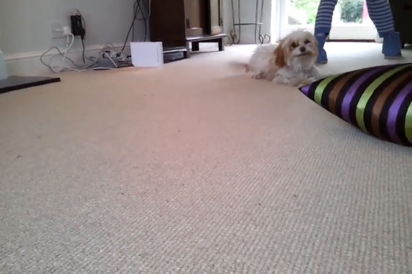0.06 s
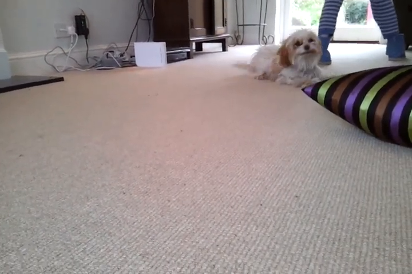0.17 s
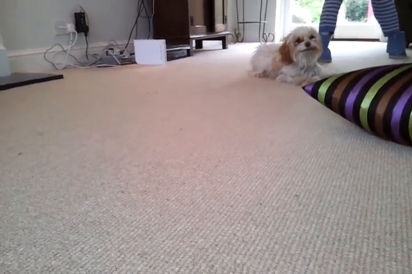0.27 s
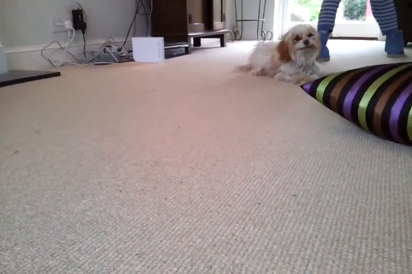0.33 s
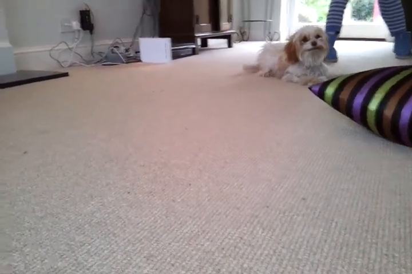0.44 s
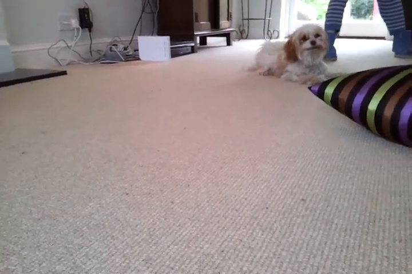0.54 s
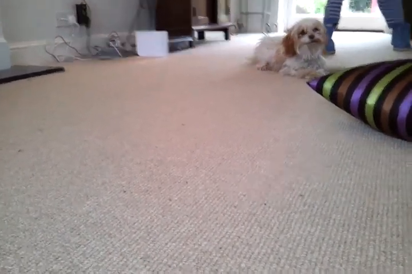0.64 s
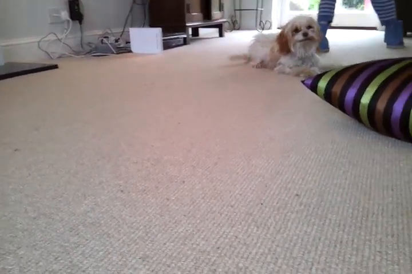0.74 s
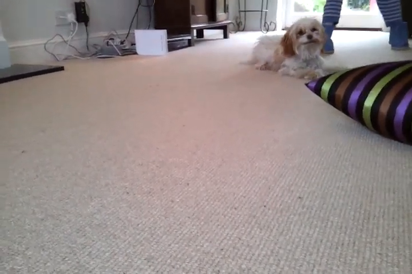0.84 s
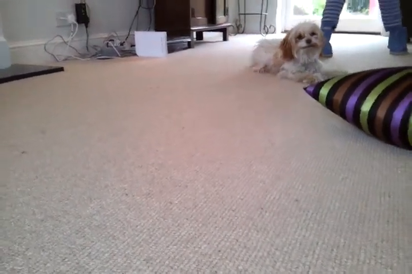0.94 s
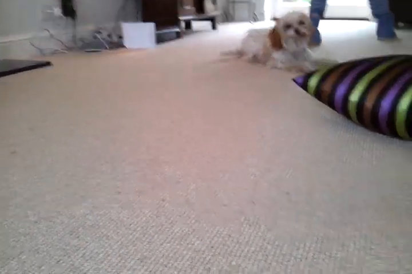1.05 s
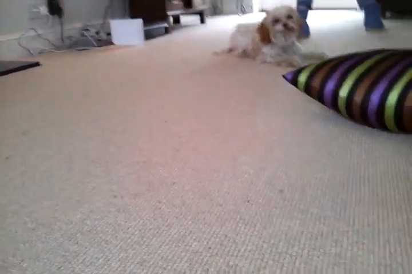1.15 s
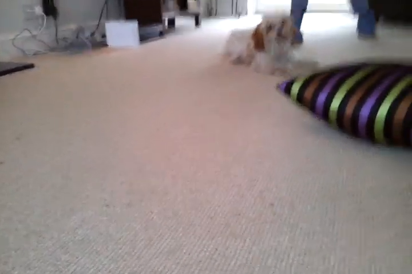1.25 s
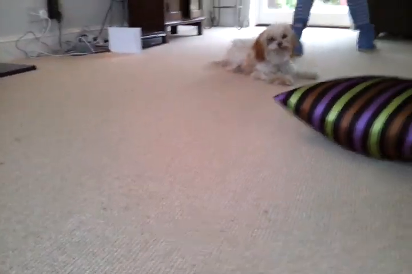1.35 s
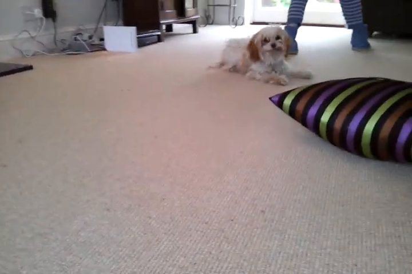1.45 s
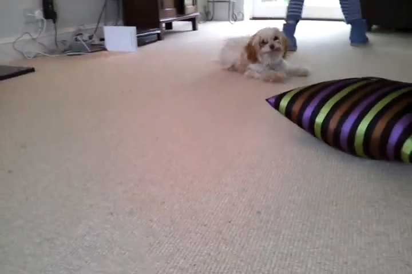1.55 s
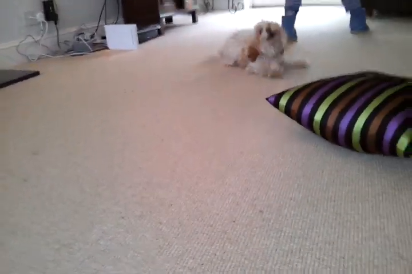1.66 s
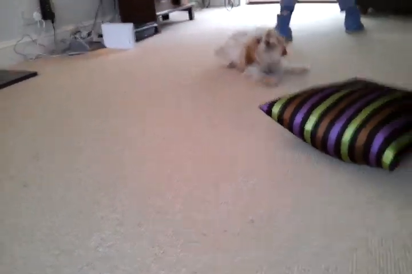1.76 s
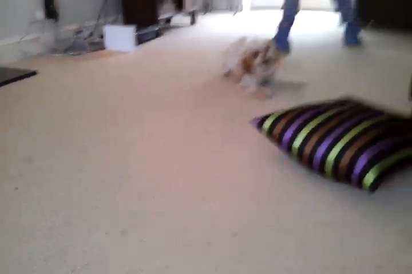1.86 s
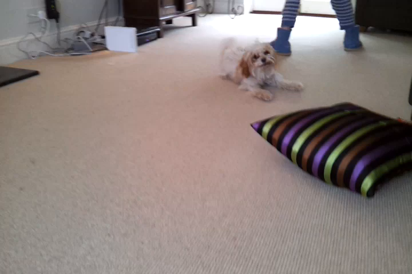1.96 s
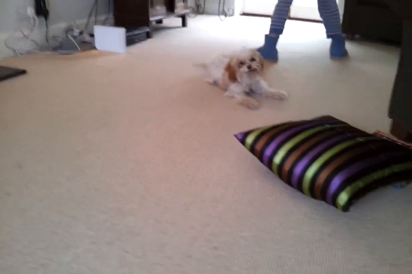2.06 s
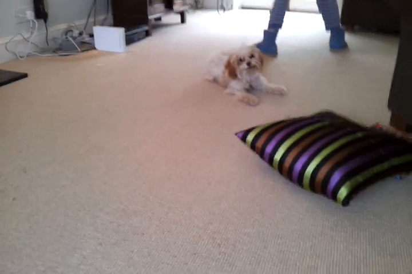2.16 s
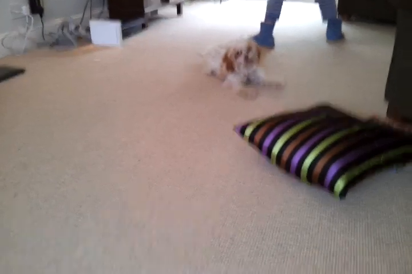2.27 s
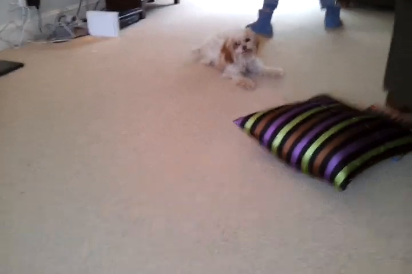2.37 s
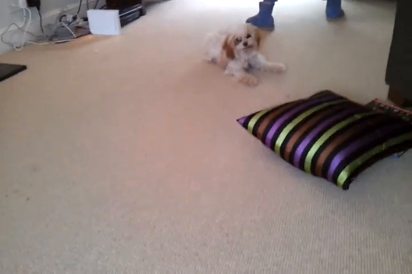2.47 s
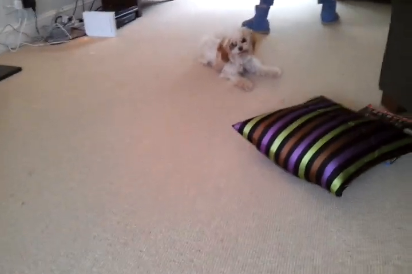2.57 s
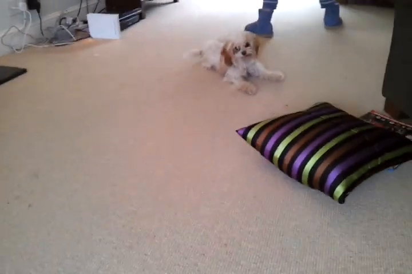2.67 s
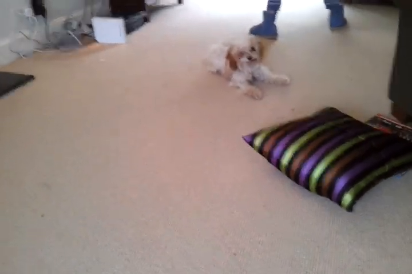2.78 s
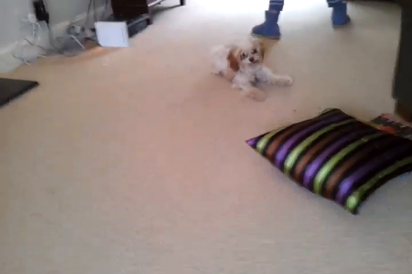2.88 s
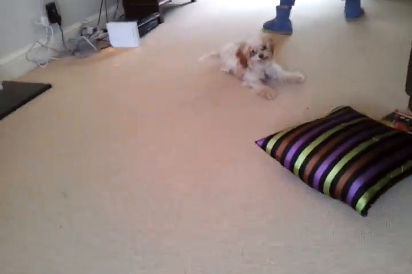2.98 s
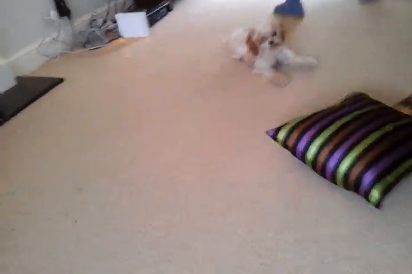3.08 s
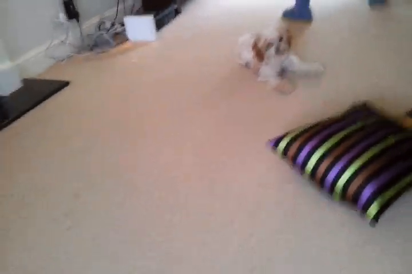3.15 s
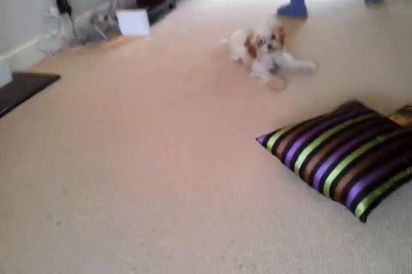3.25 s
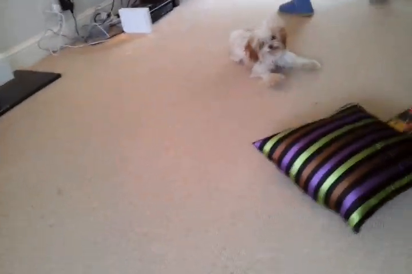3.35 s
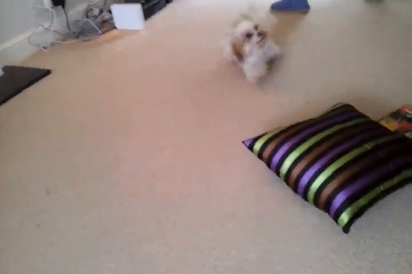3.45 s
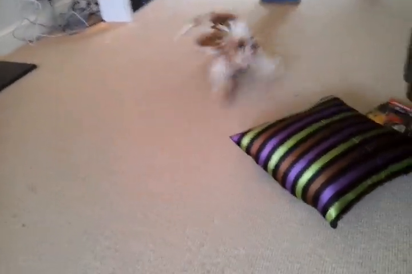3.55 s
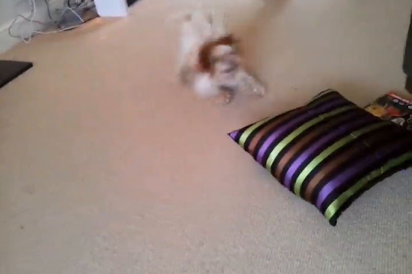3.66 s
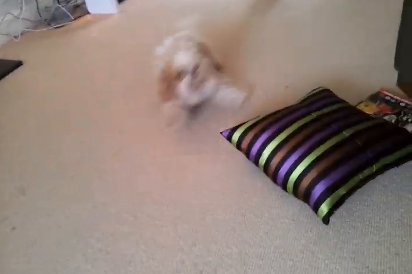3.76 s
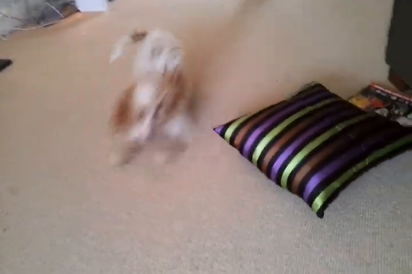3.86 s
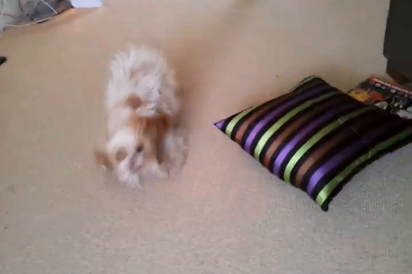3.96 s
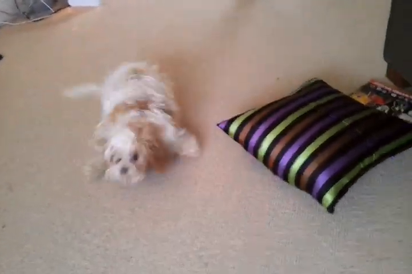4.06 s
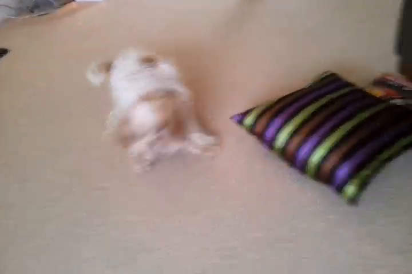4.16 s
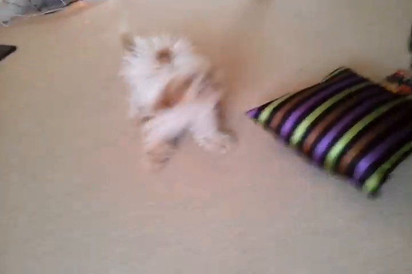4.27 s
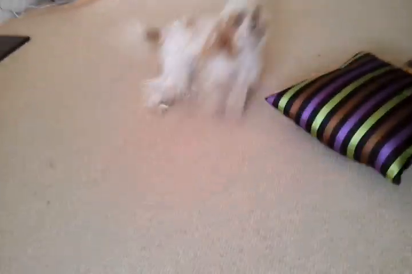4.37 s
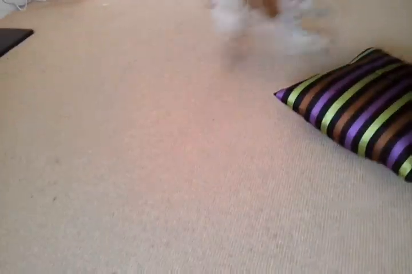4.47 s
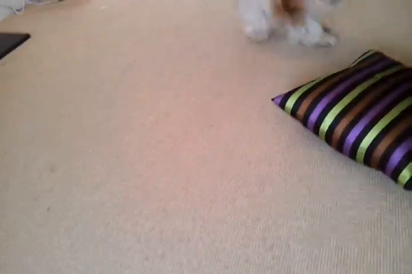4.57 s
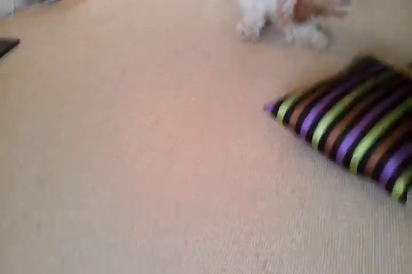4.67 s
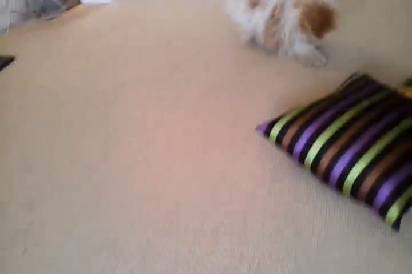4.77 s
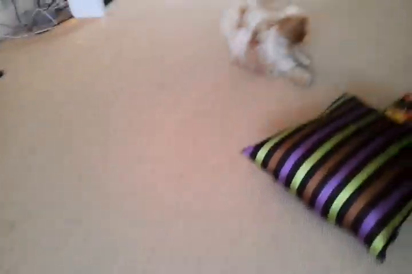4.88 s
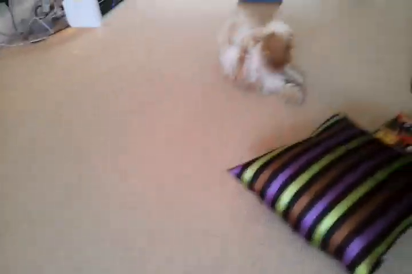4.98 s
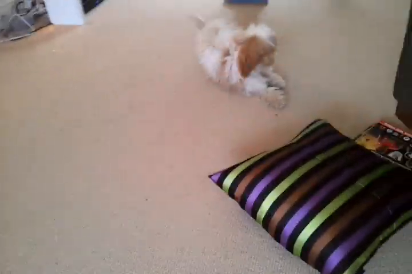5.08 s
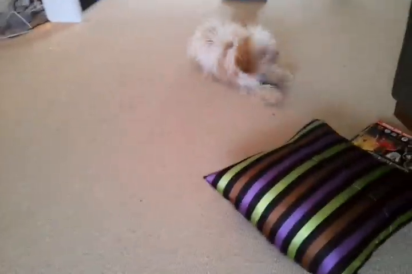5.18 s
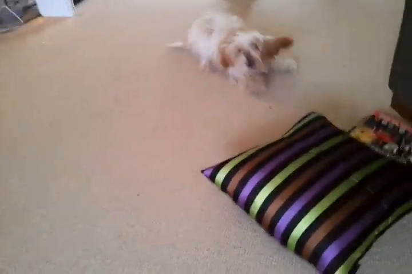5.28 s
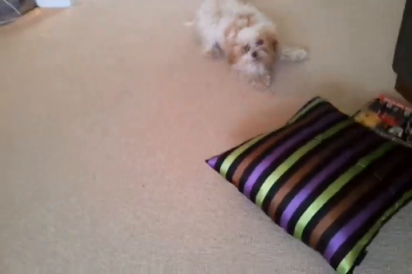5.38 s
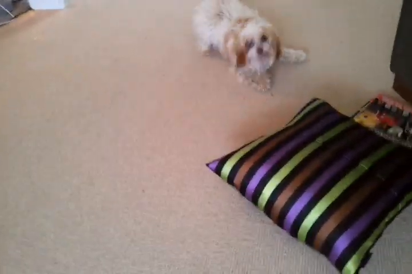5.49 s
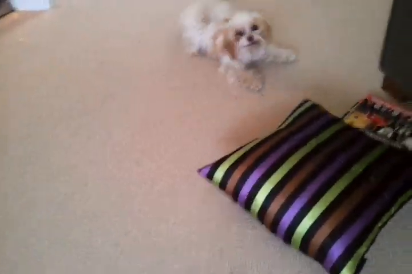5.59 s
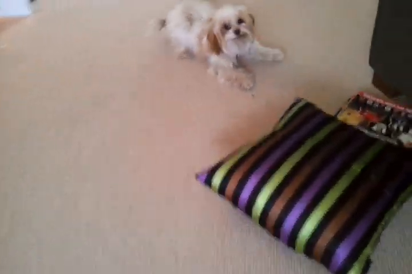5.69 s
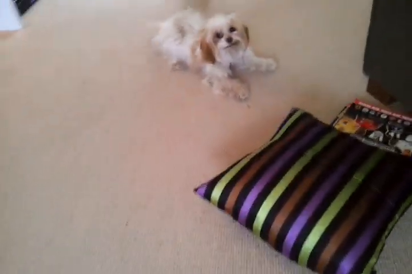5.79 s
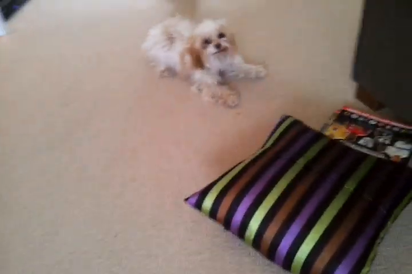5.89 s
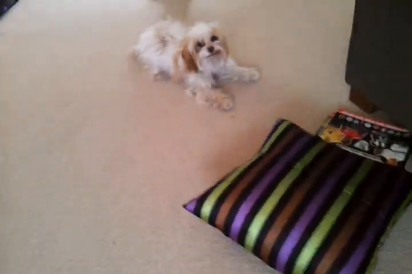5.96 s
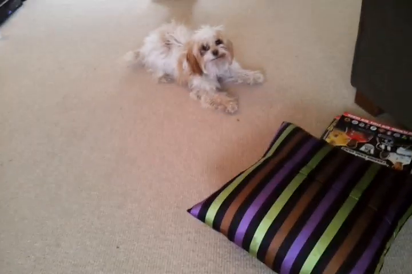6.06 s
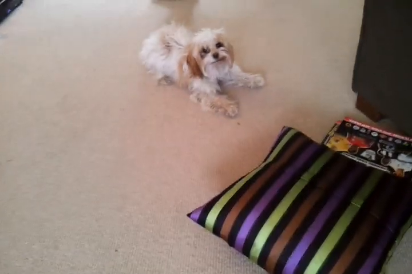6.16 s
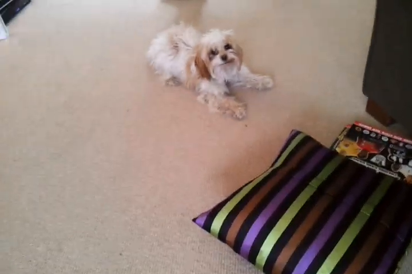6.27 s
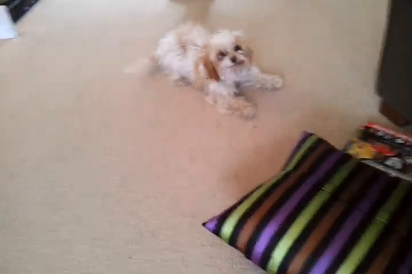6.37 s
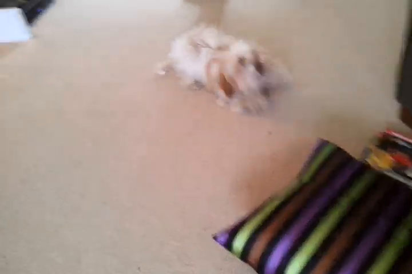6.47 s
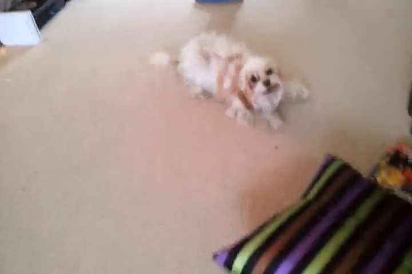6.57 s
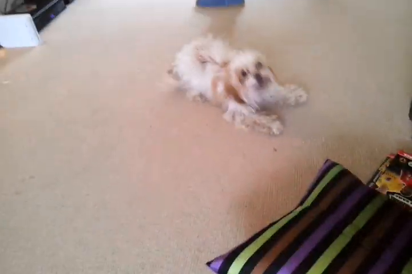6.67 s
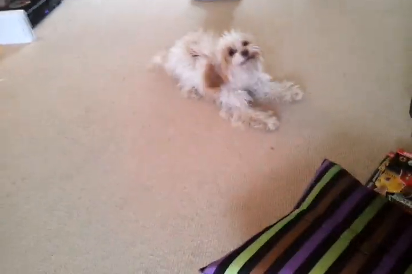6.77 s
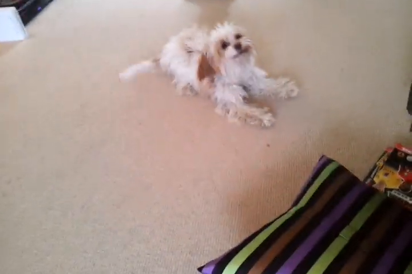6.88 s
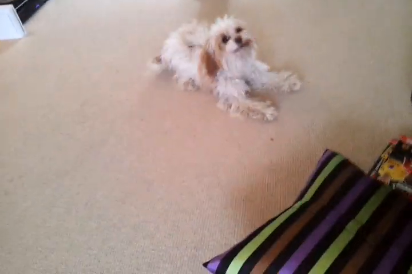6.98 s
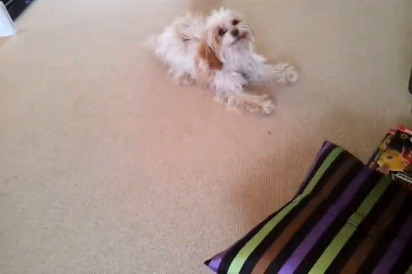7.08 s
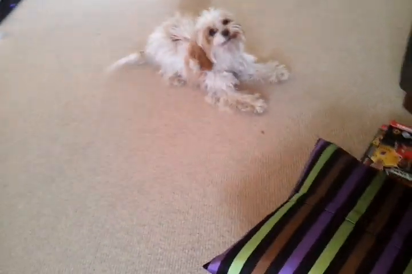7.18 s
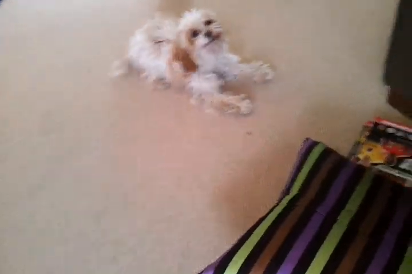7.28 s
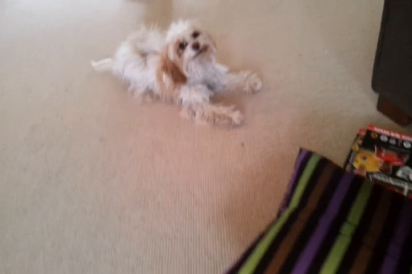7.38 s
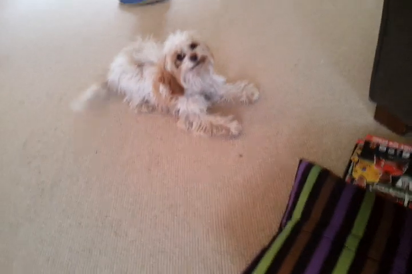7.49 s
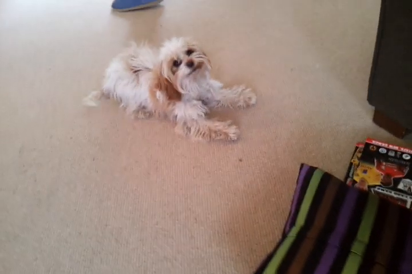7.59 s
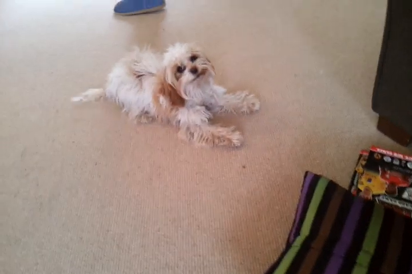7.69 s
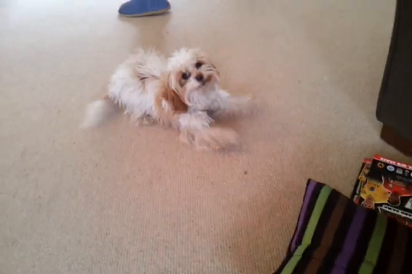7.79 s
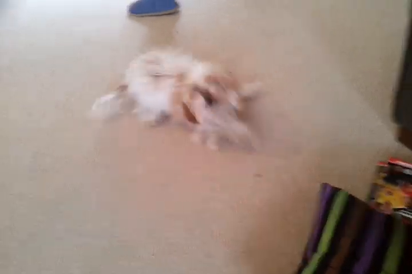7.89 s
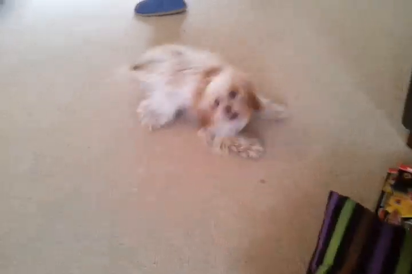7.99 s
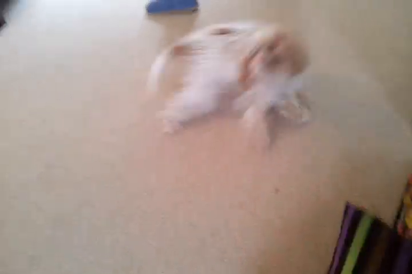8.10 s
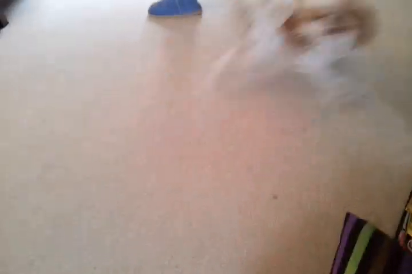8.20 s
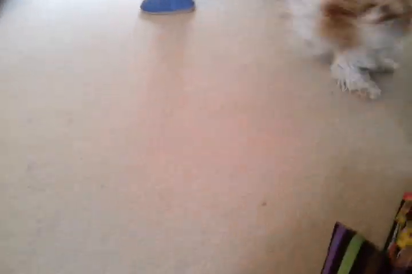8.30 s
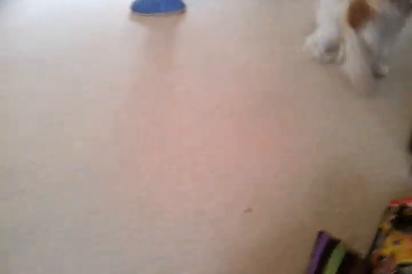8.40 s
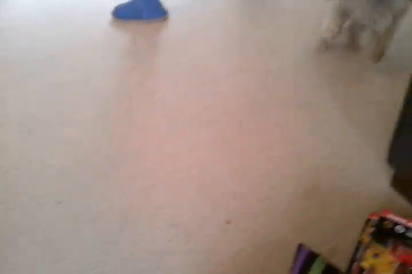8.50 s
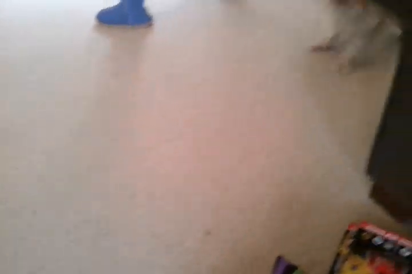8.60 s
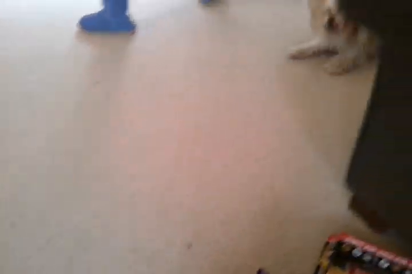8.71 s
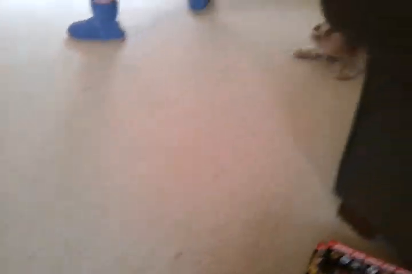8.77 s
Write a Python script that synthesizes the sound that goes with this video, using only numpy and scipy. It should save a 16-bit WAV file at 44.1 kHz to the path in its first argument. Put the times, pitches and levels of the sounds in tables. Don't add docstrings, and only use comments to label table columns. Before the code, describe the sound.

Single high, bright barks from a little dog, with quiet growls, panting and paw thumps on carpet, ending in a rapid burst of barking.

```python
import sys
import numpy as np
from scipy import signal
from scipy.fft import rfft, irfft, next_fast_len
from scipy.io import wavfile
from scipy.ndimage import uniform_filter1d, map_coordinates

SR = 44100
rng = np.random.default_rng(int(sys.argv[2]) if len(sys.argv) > 2 else 0)


def invert_db(level):
    return 10 ** (np.asarray(level, dtype=float) / 20)


def unload_audio(sound):
    columns = np.transpose(np.atleast_2d(sound))
    steps = np.round(np.clip(columns, -1, 1) * 32767)
    wavfile.write(sys.argv[1], SR, steps.astype(np.int16))


N = 389844
LEAD = SR // 4
TIME = (np.arange(N + LEAD) - LEAD) / SR


def unit(x):
    return x / np.sqrt(np.mean(x ** 2) + 1e-20)


def noise():
    return rng.standard_normal(len(TIME))


def along(points, hz):
    f, v = np.transpose(points)
    return np.interp(np.log(hz + 1), np.log(f + 1), v)


def curves(tables):
    rows = []
    for table in tables:
        table = np.array(table, float)
        before, after = table[0].copy(), table[-1].copy()
        before[0] -= .012
        after[0] += .012
        before[2] -= 45
        after[2] -= 45
        rows += [before, *table, after]
    s, *cols = np.transpose(rows)
    return [np.interp(TIME, s, c) for c in cols]


def wobble(knots_per_s):
    at = np.arange(len(TIME)) * knots_per_s / SR
    return map_coordinates(rng.standard_normal(int(at[-1]) + 4), [at])


def filtered(x, response):
    m = next_fast_len(len(x) + 8192)
    return irfft(rfft(x, m) * response(np.fft.rfftfreq(m, 1 / SR)), m)[:len(x)]


def tract(x, modes):
    def response(f):
        total = 0
        for k, (c, width, db) in enumerate(modes):
            total = total + (-1) ** k * invert_db(db) * 1j * f * width / (c * c - f * f + 1j * f * width)
        return total
    return filtered(x, response)


def folds(pitch_hz, rough, jitter, shimmer_db, tilt, air, count):
    rough = np.clip(rough, 0, 1)
    shake = np.sqrt(rough)
    unsteady_hz = pitch_hz * (1 + jitter * rough * wobble(pitch_hz.mean() / 3))
    phase = 2 * np.pi * np.cumsum(unsteady_hz) / SR
    puffs = unit(sum(np.sin(k * phase) / k ** tilt for k in range(1, count)))
    puffs = puffs * invert_db(shimmer_db * shake * wobble(pitch_hz.mean() / 4))
    hiss = unit(noise() * (1.1 + np.cos(phase)))
    return np.sqrt(1 - rough) * puffs + air * shake * hiss


def rush(spectrum, patchy_db):
    hz, _, z = signal.stft(rng.standard_normal(len(TIME) + 512), SR, nperseg=512)
    field = uniform_filter1d(rng.standard_normal(z.shape), size=5, axis=0)
    field = unit(uniform_filter1d(field, size=10, axis=1))
    gain_db = along(spectrum, hz)[:, None] + patchy_db * field
    return unit(signal.istft(z * invert_db(gain_db), nperseg=512)[1][:len(TIME)])


def swells(rows):
    power = np.zeros(len(TIME))
    for s, db, rise_s, fall_s in rows:
        first = max(round((s - 4 * rise_s) * SR) + LEAD, 0)
        near = slice(first, round((s + 4 * fall_s) * SR) + LEAD)
        t = TIME[near] - s
        drop_db = 12 * np.where(t < 0, -t / rise_s, t / fall_s)
        power[near] += invert_db(2 * (db - drop_db))
    return np.sqrt(power)


def bark_shape(timing, voice, jaw):
    s, attack_s, swell_s, fall_s, peak_db = timing
    first_hz, open_hz, top_hz, rough_in, rough_out = voice
    wide, held, rasp_db, held_db, spell_s = jaw
    start_db, halfway_db, open_db, knee_db, end_db = -31, -14, 0, -13, -31.5
    settle_s, spell_db_per_s = .012, -120
    parted, catch = .4, .2
    sag = .97
    opened, peak = s + attack_s, s + attack_s + swell_s
    clear = .25 * min(rough_in, rough_out)
    near = 1 - min(settle_s / swell_s, .9)
    near_hz = open_hz + near * (top_hz - open_hz)
    near_db = open_db + near * (peak_db - open_db)
    broken_s = spell_s + settle_s
    broken_db = peak_db + spell_db_per_s * broken_s - 1.5
    knee_s = max(.62 * fall_s, broken_s + .004)
    end_s = max(fall_s, knee_s + settle_s)
    slack, faded_db = (.55 + wide) / 2, held_db - 7
    return [(s, first_hz, start_db, rough_in + catch, parted * wide, (held_db + rasp_db) / 2),
            (s + attack_s / 2, (first_hz + open_hz) / 2, halfway_db, rough_in + catch / 2,
             (1 + parted) / 2 * wide, rasp_db),
            (opened, open_hz, open_db, rough_in, wide, rasp_db),
            (opened + near * swell_s, near_hz, near_db, .45 * rough_in, wide, rasp_db),
            (peak, .985 * top_hz, peak_db, clear, held, held_db),
            (peak + spell_s, top_hz, peak_db + spell_db_per_s * spell_s, clear, held, held_db),
            (peak + broken_s, top_hz, broken_db, .8 * rough_out, slack, held_db),
            (peak + knee_s, top_hz * (1 + sag) / 2, peak_db + knee_db, rough_out, slack, faded_db),
            (peak + end_s, sag * top_hz, peak_db + end_db, rough_out, slack, faded_db)]


# start in seconds, attack in s, swell in s, fall in s, peak effort in dB.
BARK_TIMES = [(-.22, .04, .06, .06, 9), (1.632, .042, .046, .06, 5), (3.675, .042, .03, .125, 10.5),
              (3.99, .014, .045, .11, 7), (5.318, .022, .035, .095, 9.5), (6.447, .022, .035, .11, 9),
              (7.858, .032, .055, .09, 8), (8.078, .032, .05, .12, 11), (8.385, .027, .052, .1, 7),
              (8.76, .03, .058, .1, 3.5)]
# first pitch in Hz, pitch after the attack in Hz, top pitch in Hz,
# roughness before the peak [0-1], roughness after it [0-1].
BARK_VOICES = [(799.6, 860, 872, .6, .75), (719, 690, 820, .2, .12), (541, 720, 880, .6, .15),
               (689.3, 775, 815, .18, .35), (699.9, 800, 883, .65, .75), (639.6, 785, 845, .4, .55),
               (750.7, 740, 845, .36, .5), (519, 580, 875, .45, .35), (790.2, 730, 830, .42, .5),
               (479.7, 715, 842, .3, 0.5)]
# opening after the attack [0-1], opening at the peak [0-1],
# upper throat rasp after the attack in dB, rasp at the peak in dB, clear spell in seconds.
BARK_MOUTHS = [(.4, .6, -12, -11, .01), (0.6, .8, 6, -4.5, .03), (0.5, .45, -3, -7, .035),
               (0.5, .15, -8, -8.5, .03), (.8, .15, 3.5, -14, .022), (.4, 0.7, 3, -6, .01),
               (0.46, 0.67, 3, -7.5, 0.015), (0.6, .3, -3, -5, .03), (0.3, 0.11, -6, -16, 0.032),
               (0.8, 0.48, 8.5, 0.5, .02)]
# centre in Hz, width in Hz, level in dB.
NARROW_THROAT = [(860, 318, -2), (1750, 560, -6.5), (2650, 320, -37.5), (3632.5, 1100, -17)]
WIDE_THROAT = [(841, 540, -5), (1577, 800, 1), (2180, 850, 1), (2950, 350, -7)]
UPPER_THROAT = [(4390, 420, -13), (5370, 1200, -31.5)]


def barks():
    shapes = map(bark_shape, BARK_TIMES, BARK_VOICES, BARK_MOUTHS)
    pitch_hz, effort_db, rough, mouth, rasp_db = curves(shapes)
    pitch_hz = pitch_hz * (1 + .011 * wobble(45))
    mouth = np.clip(mouth, 0, 1)
    source = folds(pitch_hz, rough, jitter=.17, shimmer_db=7, tilt=.35, air=2.2, count=9)
    source = source * invert_db(effort_db + 5)
    narrow = tract(source * (1 - mouth), NARROW_THROAT)
    wide = tract(source * mouth, WIDE_THROAT)
    return narrow + wide + tract(source * invert_db(rasp_db), UPPER_THROAT)


def yip_shape(s, first_hz, core_hz, db, mouth):
    core_end, edge_db = s + .028, db - 8
    return [(s - .07, first_hz, db - 23, .8, .35),
            (s - .02, first_hz, edge_db, .6, .45),
            (s, core_hz, db, .15, mouth),
            (core_end, core_hz, db, .15, mouth),
            (core_end + .013, core_hz, edge_db, .5, .72 * mouth),
            (core_end + .04 + .1 * mouth, core_hz, db - 25, .55, .66 * mouth)]


# core start in seconds, first pitch in Hz, core pitch in Hz, level in dB, mouth opening [0-1].
SOFT_YIPS = [
    (4.43, 558.3, 571.8, -20.5, 0),
    (4.708, 610, 699.3, -13.5, 0.8),
]
# time in seconds, pitch in Hz, level in dB, roughness [0-1], mouth opening [0-1].
FAINT_WHINE = [(1.04, 775, -60, .01, .01), (1.1, 775, -51, .01, .01), (1.22, 775, -54, .01, .01)]
# centre in Hz, width in Hz, level in dB.
SHUT_MOUTH = [(522.26, 110, 5.5), (1010, 120, -3), (1350, 440, -16), (1953, 490, -16.5)]
AJAR_MOUTH = [(702, 590, -6.5), (1394, 250, 3), (2200, 660, -12), (4180, 240, -17)]


def yips():
    shapes = [FAINT_WHINE, *(yip_shape(*row) for row in SOFT_YIPS)]
    pitch_hz, level_db, rough, mouth = curves(shapes)
    mouth = np.clip(mouth, 0, 1)
    source = folds(pitch_hz, rough, jitter=.13, shimmer_db=6, tilt=.3, air=4, count=4)
    source = source * invert_db(level_db + 3)
    dark = tract(source, [(900, 2900, .5)])
    bright = tract(source, [(1900, 5000, .5)])
    return tract(dark * (1 - mouth), SHUT_MOUTH) + tract(bright * mouth, AJAR_MOUTH)


# loudest in seconds, pitch in Hz, level in dB, fade in s, throat ring in dB.
SHORT_GRUNTS = [
    (.012, 257.4, -29, .1, -2),
    (8.035, 423.3, -15.5, .04, -0.5),
    (8.347, 223.1, -25.5, 0.046, -11),
]
# time in seconds, pitch in Hz, level in dB, throat ring in dB.
GROWLS_INTO_BARKS = [
    [(1.55, 171.5, -52.5, -10), (1.595, 190, -45.5, -29), (1.628, 328.8, -21, -2.5)],
    [(7.832, 190, -55.5, -25.5), (7.862, 330.3, -23, -4)],
]
LONG_GROWL = [(4.139, 310.8, -25, -13), (4.2, 243.6, -21.5, -20), (4.282, 197.5, -34.5, 1),
              (4.352, 238.9, -26.5, -9.5), (4.44, 215, -33.5, 11.5), (4.55, 164.9, -36, -19),
              (4.679, 190, -32.5, 6), (4.8, 237.2, -31, -7), (4.99, 232, -61.5, -8)]
FALLING_MOAN = [(6.62, 149.4, -43.5, -26.5), (6.67, 187.3, -29, -6.5), (6.73, 193.9, -36, 0.5),
                (6.78, 251.1, -23, -3), (6.815, 214, -30, -7), (6.849, 170.6, -31.5, -11),
                (6.9, 147.8, -42, -15), (6.969, 124.1, -49.5, -22), (7.101, 104.3, -52, -13)]
# centre in Hz, width in Hz, level in dB.
CHEST_MODES = [(190, 200, -1.5), (484, 130, -1.4)]


def grumble():
    calls = [*GROWLS_INTO_BARKS, LONG_GROWL, FALLING_MOAN]
    for s, hz, db, fade_s, ring in SHORT_GRUNTS:
        calls.append([(s - .025, hz, db - 13, ring),
                      (s, hz, db, ring),
                      (s + fade_s, hz, db - 300 * fade_s, ring)])
    pitch_hz, level_db, ring_db = curves(sorted(calls, key=lambda rows: rows[0][0]))
    rough = np.full(len(TIME), .22)
    source = folds(pitch_hz, rough, jitter=.36, shimmer_db=4, tilt=.45, air=3, count=12)
    source = source * invert_db(level_db + 3.5)
    breath = tract(invert_db(level_db + 16) * noise(), [(885, 590, .54)])
    source = filtered(source, lambda hz: 1 / np.sqrt(1 + (105 / (hz + 1)) ** 8))
    throat = [(481, 800, -9.5), (951, 230, .5), (1522.8, 210, -3.5)]
    return tract(source, CHEST_MODES) + tract((source + breath) * invert_db(ring_db), throat)


# loudest in seconds, level in dB, rise in s, fall in s.
NOSE_WHISTLES = [(4.7, -37, .03, .05), (6.745, -38, .04, 0.032)]
# centre in Hz, width in Hz, level in dB.
NOSTRILS = [(3830, 400, 0), (4650, 600, 0)]


def snorts():
    hiss = unit(tract(tract(noise(), NOSTRILS), NOSTRILS))
    return swells(NOSE_WHISTLES) * hiss


# loudest in seconds, level in dB, rise in s, fall in s.
BREATHS = [(.19, -56.5, 0.26, 0.73), (.826, -50, 0.089, 0.045), (1.04, -50, .17, 0.12),
           (1.19, -55, .05, .1), (1.314, -49, .09, 0.11), (1.58, -55, .4, .05), (1.946, -30.5, 0.095, 0.11),
           (2.334, -43, 0.18, 0.036), (2.742, -50.5, 0.097, 0.1877), (3.45, -52, 0.23, 0.13),
           (3.66, -56, .2, 0.021), (4.2, -51, 0.013, .08), (4.444, -50.5, 0.47, .15),
           (4.656, -47.5, .11, 0.41), (4.898, -53.5, .2, 0.2081), (5.6, -62.5, 0.027, .08),
           (5.78, -56, .005, .012), (5.914, -58.5, .016, 0.21), (6.744, -43, .04, 0.03403),
           (6.954, -55.5, 0.065, 0.19), (7.568, -54, 0.091, 0.1553), (7.84, -56.5, .05, 0.011),
           (8.68, -46, .1, 0.12)]
# frequency in Hz, density in dB per Hz.
BREATH_SPECTRUM = [(880, -43.5), (1500, -20), (1960, -11.5), (2190, -7), (3360, -13.5), (3640, -5.5),
                   (4270, -11), (4760, -6.5), (6040, -10), (7190, -8), (8500, -17.5), (11000, -75.5),
                   (18700, -120)]


def panting():
    return swells(BREATHS) * invert_db(.15 + wobble(40)) * rush(BREATH_SPECTRUM, patchy_db=.5)


# loudest in seconds, level in dB, rise in s, fall in s.
DRAGS = [(.252, -59, 0.06804, .04), (.464, -53.5, .008, 0.07), (1.24, -49, .4, 0.26),
         (1.462, -68.5, 0.0906, .008), (1.484, -50, 0.01079, 0.2825), (1.95, -43, 0.01197, 0.2),
         (2.358, -44.5, .22, 0.047), (2.546, -48.5, .012, 0.026), (2.814, -54.5, .13, 0.17),
         (3.07, -51, .032, 0.12), (3.442, -39, 0.063, 0.082), (3.635, -34, 0.004954, 0.069),
         (4.9, -42.5, 0.011, 0.13), (5.156, -53, 0.096, 0.11), (5.27, -47, .015, .05),
         (5.7, -57.5, 0.0101, 0.057), (5.976, -54, 0.11, 0.16), (6.208, -52, .007, .06),
         (6.326, -53, 0.0092, 0.0889), (6.9, -43.5, 0.0091, 0.045), (6.95, -52.5, .02, .4),
         (7.256, -56.5, .008, .07), (7.63, -48, 0.2, .17)]
# frequency in Hz, density in dB per Hz.
RUB_SPECTRUM = [(71, -45.5), (120, -17.5), (594, -10.5), (729, -13), (1240, -13), (2190, -21.5),
                (4000, -28), (5200, -47.5), (8800, -120)]


def scuffs():
    return swells(DRAGS) * invert_db(-4.5 + 2 * wobble(50)) * rush(RUB_SPECTRUM, patchy_db=2.5)


# time in seconds, peak in dB, centre in Hz, t60 in s.
PAW_CONTACTS = [(0.468, -48, 1140, 0.075), (1.172, -32, 573, 0.024), (1.249, -40.5, 1316, 0.05),
                (1.48, -40, 1048, 0.067), (2.449, -49, 347.8, 0.05), (2.549, -44, 117.6, 0.037),
                (3.019, -44.5, 107.8, 0.083), (3.079, -41, 103, 0.064), (3.369, -40, 390, 0.18),
                (3.624, -29, 883, 0.023), (4.884, -30.5, 571, 0.046), (5.779, -63, 102, 0.052),
                (6.326, -32, 240, 0.065), (7.089, -38, 1060, 0.051), (7.598, -27.5, 1024, 0.046)]


def paws():
    out, t = np.zeros(len(TIME) + SR), np.arange(SR // 4) / SR
    onset = 1 - np.exp(-t / .00058)
    ring_share = .45
    for s, db, hz, t60_s in PAW_CONTACTS:
        pad = [(.68 * hz + 260, 950, 0)]
        puff = unit(tract(tract(rng.standard_normal(len(t)), pad), pad))
        touch = ring_share * np.sin(2 * np.pi * hz * t) + .86 * (1 - ring_share) * puff
        out[round(s * SR) + LEAD:][:len(t)] += invert_db(db - 60 * t / t60_s) * touch * onset
    return out[:len(TIME)]


# time in seconds, peak in dB.
CLAW_TICKS = [(1.179, -38), (4.886, -26), (5.779, -47)]


def claws():
    out, t = np.zeros(len(TIME)), np.arange(SR // 20) / SR
    t60_s = .02
    for s, db in CLAW_TICKS:
        out[round(s * SR) + LEAD:][:len(t)] += invert_db(db - 60 * t / t60_s) * rng.standard_normal(len(t))
    return tract(out, [(1500, 6000, .00405)])


# frequency in Hz, t60 in s.
ROOM_T60 = [(150, 0.55), (800, 0.35), (2500, 0.28546), (7000, 0.47)]


def room(x):
    out, hop = np.zeros(len(x) + 2 * SR), SR // 2
    for start in range(0, len(x), hop):
        hz, t, z = signal.stft(rng.standard_normal(hop + hop // 2), SR, nperseg=256)
        decay = invert_db(-60 * t / along(ROOM_T60, hz)[:, None])
        tail = signal.istft(z * decay, SR, nperseg=256)[1]
        wet = signal.fftconvolve(x[start:start + hop], tail / np.linalg.norm(tail))
        out[start + 220:][:len(wet)] += wet
    return out[:len(x)]


# frequency in Hz, density in dB per Hz.
HUSH_SPECTRUM = [(12, -38), (20, -7), (44, -1), (104, 5.5), (148, 1.5), (350, 0), (1270, -6), (2860, -8.5),
                 (5390, -9), (6940, -8.5), (8500, -42.5), (11000, -82), (18700, -120)]


def hush():
    return invert_db(-59 + 1.83 + .83 * wobble(5.7)) * rush(HUSH_SPECTRUM, patchy_db=.5)


def scene():
    voice = barks() + yips() + grumble()
    small = snorts() + panting() + scuffs() + paws() + claws()
    echo = room(invert_db(-7.5) * voice + invert_db(-5.5) * small)
    mix = voice + small + echo + hush()
    return mix[None, LEAD:]


def ceiling(x, top, hard):
    return x / (1 + np.abs(x / top) ** hard) ** (1 / hard)


# frequency in Hz, gain in dB.
PORT_GAIN = [(20, 0), (7000, 0), (8000, -6), (9000, -40), (11000, -80)]
TREBLE_GAIN = [(20, 0), (5000, 0), (6800, -2), (7800, -9), (8800, -18), (11000, -17), (15500, -13)]


def microphone(x):
    heard = filtered(x, lambda hz: invert_db(along(PORT_GAIN, hz)))
    clipped = ceiling(heard, .7, 12)
    dulled = filtered(clipped, lambda hz: invert_db(along(TREBLE_GAIN, hz)))
    return ceiling(dulled, .79, 26)


def roll_off(x):
    return signal.sosfilt(signal.butter(12, 16330, fs=SR, output="sos"), x)


def record(dry):
    mix = microphone(dry[0])[None]
    return roll_off(mix)


dry = scene()
out = record(dry)
unload_audio(out)
```